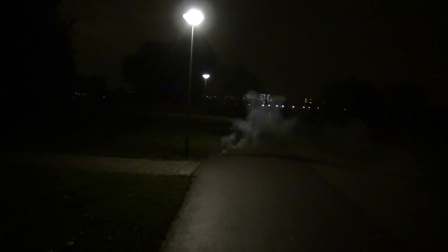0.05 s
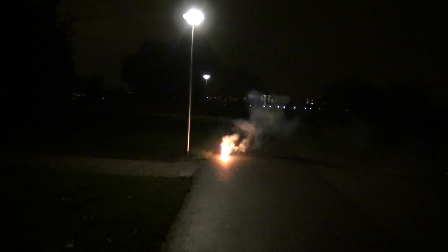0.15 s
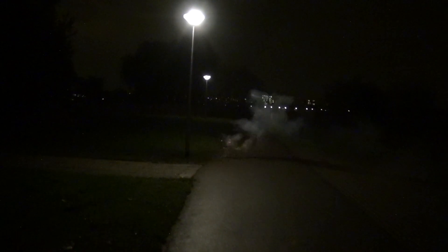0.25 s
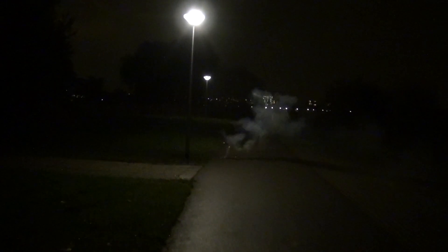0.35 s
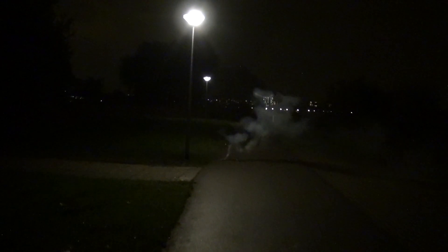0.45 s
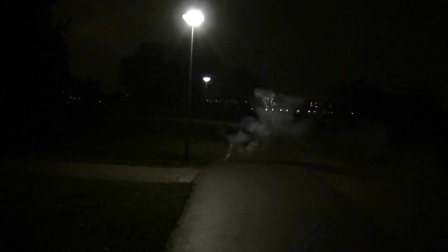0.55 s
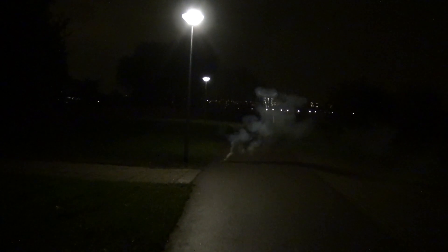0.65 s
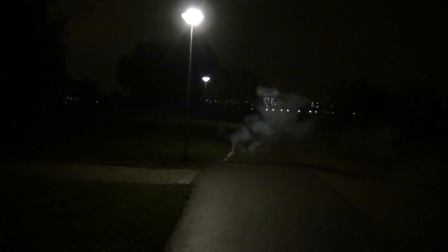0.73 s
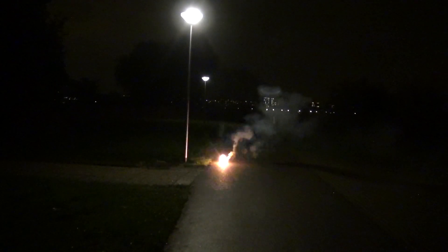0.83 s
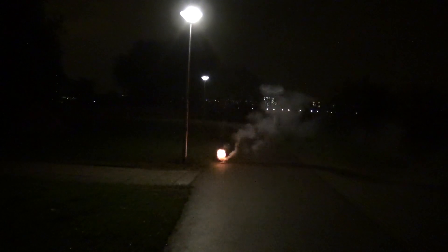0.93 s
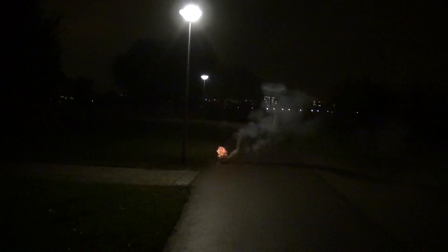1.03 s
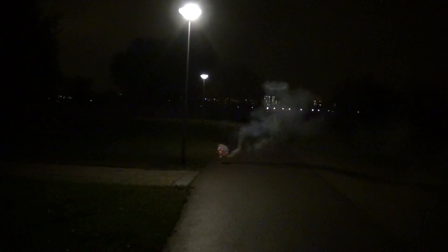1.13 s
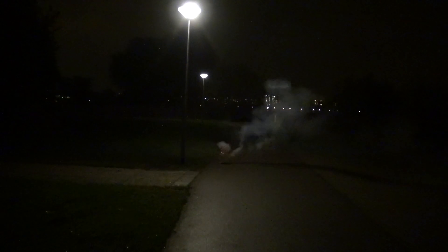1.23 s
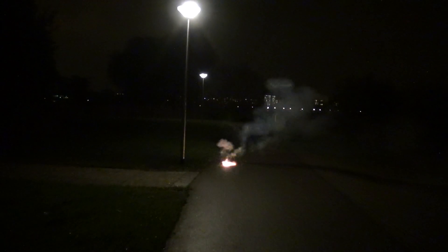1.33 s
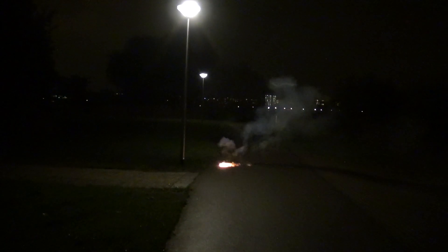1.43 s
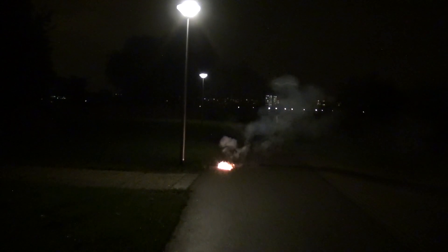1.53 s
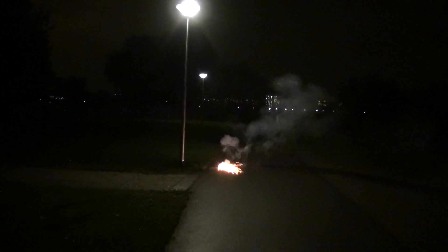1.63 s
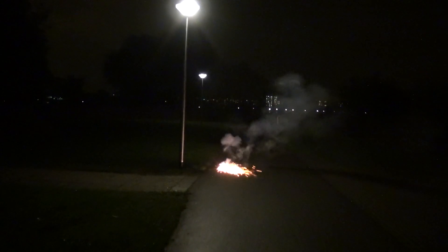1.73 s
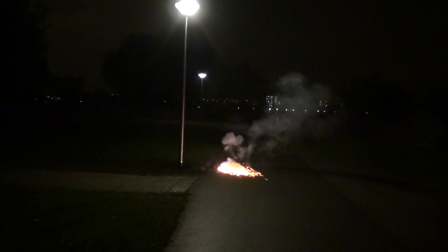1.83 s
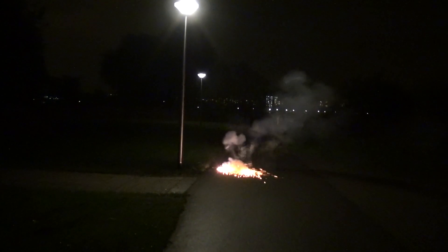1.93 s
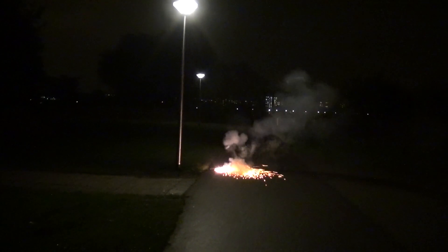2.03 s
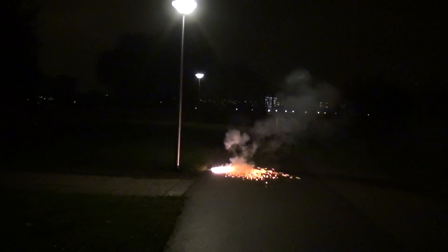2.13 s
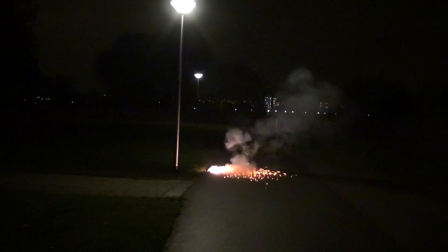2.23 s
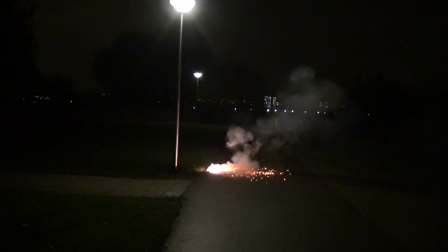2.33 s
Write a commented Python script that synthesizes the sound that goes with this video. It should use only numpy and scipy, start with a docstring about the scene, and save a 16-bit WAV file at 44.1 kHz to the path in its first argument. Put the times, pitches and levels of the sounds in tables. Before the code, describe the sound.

Firecracker fizzes faintly, bangs three times outdoors with quick echoes, then flares into a spitting, roaring jet

```python
"""First a fuse fizzes faintly over the rumble of a distant town, on a paved park path at night.
Then a firecracker cracks three times and burns as a roaring, spitting flame.
Each crack is a shock front with swings, a thump and tearing noise; it overloads the close microphone.
A lamp post, a wall on the left and the trees around return it as filtered echoes and grainy scatter.
Town, fuse and flame are coloured noise in two channels, the last two with drawn level curves."""
import sys
import numpy as np
from scipy import signal
from scipy.fft import rfft, irfft
from scipy.io import wavfile
from scipy.ndimage import uniform_filter1d

SR = 44100
rng = np.random.default_rng(int(sys.argv[2]) if len(sys.argv) > 2 else 0)


def put_to_file(sound):
    """Save the sound as 16-bit audio at rate SR, in the file named by the first command-line argument."""
    columns = np.atleast_2d(sound).T  # one column per channel
    safe = np.clip(columns, -1, 1)
    whole_steps = np.round(safe * 32767)
    wavfile.write(sys.argv[1], SR, whole_steps.astype(np.int16))


N = 105840  # samples, 2.4 s


def undb(db):
    """Amplitude gain of a level in dB."""
    return 10 ** (np.asarray(db) / 20)


def pan(left_right_db):
    """Left and right gains for a level difference; positive leans left."""
    return undb(np.array([[left_right_db], [-left_right_db]]) / 2)


def noise(spectrum, grain_db=0):
    """Noise of rms 1 with the given colour; uneven sample sizes make it crackle."""
    table_hz, table_db = np.array(spectrum, float).T
    hz = np.maximum(np.arange(N // 2 + 1) * SR / N, 1)
    grain_size = np.minimum(rng.exponential(size=N), 7)
    grains = rng.standard_normal(N) * undb(grain_db * grain_size)
    colour = undb(np.interp(np.log(hz), np.log(table_hz), table_db))
    bass_cut = hz / np.hypot(hz, 20)
    coloured = irfft(rfft(grains) * colour * bass_cut, N)
    return coloured / coloured.std()


def wide(spectrum, likeness, grain_db=0):
    """Two channels of noise, alike to the given degree (0-1), mixed from a middle and a side."""
    mid, side = noise(spectrum, grain_db), noise(spectrum, grain_db)
    side_signs = np.array([[1], [-1]])
    return np.sqrt((1 + likeness) / 2) * mid + np.sqrt((1 - likeness) / 2) * side * side_signs


def walk(hz):
    """Smooth random curve with a spread of 1, from noise averaged twice over 1/hz seconds."""
    width = max(int(SR / hz), 1)
    smooth = uniform_filter1d(uniform_filter1d(rng.standard_normal(N), width), width)
    return smooth / smooth.std()


def ms_since(start):
    """Milliseconds since a moment in seconds, negative before it."""
    return (np.arange(N) - round(start * SR)) * 1000 / SR


def swing(start, hz, decay_ms):
    """Pressure swinging briefly behind a shock front: a decaying cosine."""
    ms = ms_since(start)
    cycles = hz * ms / 1000
    return (ms >= 0) * np.cos(2 * np.pi * cycles) * np.exp(-np.abs(ms) / decay_ms)


def thump(start, hz, rise_ms):
    """A low push of gas: a sine whose envelope peaks at rise_ms and dies away."""
    ms = np.maximum(ms_since(start), 0)
    cycles = hz * ms / 1000
    envelope = (ms / rise_ms * np.exp(1 - ms / rise_ms)) ** 2
    return -np.sin(2 * np.pi * cycles) * envelope


# Far off, low rumble of the town: f/Hz, relative level per Hz/dB
TOWN_RUMBLE = [(25, 1.5), (55, -8.5), (100, -5), (128, -1.5), (195, -7.5), (260, -24.5), (500, -37),
               (2000, -77)]
# Far off, wash of its roads: f/Hz, relative level per Hz/dB
ROAD_WASH = [(100, -1), (300, -5), (450, -8.5), (680, -4), (1250, -5.5), (2200, -14.5), (4000, -24.5),
             (9000, -29), (16000, -33)]
RUMBLE_DB, RUMBLE_LIKENESS = -40, 0.72
ROADS_DB, ROADS_LIKENESS = -43, 0.27


def town():
    """Far traffic: a rumble largely common to both ears and a wider wash, both steady noise."""
    rumble = undb(RUMBLE_DB) * wide(TOWN_RUMBLE, RUMBLE_LIKENESS)
    roads = undb(ROADS_DB) * wide(ROAD_WASH, ROADS_LIKENESS)
    return rumble + roads


# Course of the fuse at the microphone: t/s, level/dB
FUSE_LEVELS = [(0, -46), (.05, -46.5), (.11, -54.5), (.2, -52), (.48, -55), (.61, -48), (0.729, -59),
               (0.898, -65), (1.298, -53), (1.419, -44)]
# Colour of its fizz: f/Hz, relative level per Hz/dB
FUSE_FIZZ = [(500, 1), (1700, 4), (3000, 0), (6000, -4.5), (8500, -23), (11000, -40), (16000, -34)]
# Crackle and likeness of the ears (0-1), shared by the fuse and the hiss of the flame
SPARK_GRAIN_DB, HISS_LIKENESS = 3, 0.96


def fuse(t):
    """A faint, grainy fizz of burning powder that comes and goes until the flame is lit."""
    times, level_db = np.array(FUSE_LEVELS).T
    fizz = wide(FUSE_FIZZ, HISS_LIKENESS, SPARK_GRAIN_DB)
    return undb(np.interp(t, times, level_db)) * (t < times[-1]) * fizz


# Course of the flame at the microphone, before flutter: t/s, roar level/dB, hiss level/dB
FLAME_LEVELS = [(1.422, -26, -39), (1.45, -37.5, -28), (1.55, -29, -36), (1.61, -31.5, -41.5),
                (1.71, -27, -32.5), (1.80, -25.5, -38.5), (1.94, -25, -36), (1.99, -24, -27.5),
                (2.084, -25.5, -25.5), (2.134, -30.5, -34), (2.18, -32, -43), (2.4, -41.5, -56)]
# Colour of its roar: f/Hz, relative level per Hz/dB
FLAME_ROAR = [(50, -31), (110, -18), (190, -2), (350, 0.5), (650, 3), (1250, 0.5), (1900, -8), (3500, -23),
              (8000, -34.5)]
# Colour of its hiss: f/Hz, relative level per Hz/dB
FLAME_HISS = [(400, 10.5), (1300, -2.5), (2500, 2), (4200, -5.5), (8000, -11), (11000, -19.5),
              (16000, -88.5)]
# Puffs of gas in the flame: t/s, level/dB
GAS_PUFFS = [(1.927, -14), (1.983, -24), (2.019, -31)]
FLUTTER_DB, FLUTTER_HZ, ROAR_LIKENESS = 0.52, 69, 0.99
PUFF_HZ, PUFF_RISE_MS = 189, 2.9


def flame(t):
    """The last bang lights a fluttering jet: a swelling roar, a spitting hiss and low puffs of gas."""
    times, roar_db, hiss_db = np.array(FLAME_LEVELS).T
    flutter_db = FLUTTER_DB * walk(FLUTTER_HZ)
    roar_gain = undb(np.interp(t, times, roar_db) + flutter_db)
    hiss_gain = undb(np.interp(t, times, hiss_db) + flutter_db)
    roar = roar_gain * wide(FLAME_ROAR, ROAR_LIKENESS)
    hiss = hiss_gain * wide(FLAME_HISS, HISS_LIKENESS, SPARK_GRAIN_DB)
    puffs = sum(undb(db) * thump(start, PUFF_HZ, PUFF_RISE_MS) for start, db in GAS_PUFFS)
    return (t > times[0]) * (roar + hiss) + puffs


# Scatter from ground and groups of trees: delay t/s, spread in log delay, level/dB,
# left-right/dB, likeness of the ears (0-1), treble lift/dB at TREBLE_HZ
TREE_GROUPS = [(.012, 0.88, -50, -7.5, .85, -0.5), (0.045, 0.25, -41.5, 5.5, 0.43, 9.5),
               (.085, 0.22, -44.5, 5, 0.66, 0.5), (.14, 0.24, -48.5, 4, 0.08, 7.5),
               (0.211, 0.18, -57, 3, 0.77, 7.5), (.37, 0.2, -68, 1.5, 1, 1.5)]
# Colour the foliage returns: f/Hz, relative level per Hz/dB
FOLIAGE_COLOUR = [(60, 4), (180, 5), (430, -3.5), (650, -2), (900, -3), (1300, -0.5), (2500, 2.5),
                  (4200, -2), (8000, -4), (11000, -14.5), (16000, -24.5)]
FOLIAGE_GRAIN_DB, TREBLE_HZ = 3, 10400


def trees():
    """Many small reflections: grainy noise that swells and fades around each group's delay."""
    scatter = np.zeros((2, N))
    t = np.arange(1, N + 1) / SR  # starts one sample late, for the logarithm
    for delay, spread, level_db, pan_db, likeness, treble_db in TREE_GROUPS:
        colour = [(hz, db + treble_db * hz / TREBLE_HZ) for hz, db in FOLIAGE_COLOUR]
        swell = np.exp(-0.5 * (np.log(t / delay) / spread) ** 2)
        leaves = wide(colour, likeness, FOLIAGE_GRAIN_DB)
        scatter += undb(level_db) * pan(pan_db) * swell * leaves
    return scatter


# Single echoes: delay t/s, level before band filter/dB, left-right/dB, smear/ms,
# bass edge f/Hz, treble edge f/Hz
SINGLE_ECHOES = [(0.012, -11.5, 15, 0.052, 1380, 8040), (.0225, -23, 7, 0.15, 900, 6000),
                 (0.044, -21, 17, 3, 300, 2750), (0.08, -15.5, 12, .4, 800, 3200),
                 (0.0845, -12, 12, 0.66, 610, 4950), (0.1041, -23, -10, 0.54, 900, 8300),
                 (0.1445, -23, 3, 3.9, 900, 4500), (0.1809, -17.5, 3.5, 1.4, 406, 1880),
                 (0.36, -28, 1, 6.9, 820, 4350), (.4000, -32, 1, 4, 754, 2000),
                 (.4270, -33, -4, 2.1, 684, 1800)]


def echoes():
    """Each single reflector returns a click with a rough, decaying tail, limited to a band."""
    reflections = np.zeros((2, N))
    for delay, level_db, pan_db, smear_ms, low_hz, high_hz in SINGLE_ECHOES:
        ms = ms_since(delay)
        tail = (ms > 0) * np.exp(-np.abs(ms) / smear_ms) * rng.standard_normal(N)
        echo = (ms == 0) + tail
        echo = echo / np.linalg.norm(echo) + 1e-18  # unit energy; the offset is inaudible
        band = signal.butter(2, [low_hz, high_hz], "band", fs=SR, output="sos")
        reflections += undb(level_db) * pan(pan_db) * signal.sosfilt(band, echo)
    return reflections


# Bangs close to the microphone: t/s, shock level/dB, shock length/ms, after-swing f/Hz,
# after-swing level/dB, low swing level/dB, thump level/dB, tearing level/dB,
# tearing lead/ms, tearing decay/ms
CRACKS = [(0.2226, 10.5, 0.13, 1168, 9.5, 4, -2, -3, 0.037, 1.54),
          (.9240, 19.5, 0.12, 1050, 10.5, -2.5, -10.5, -8, 0.038, 3.3),
          (1.4198, 1.5, 0.13, 950, -1.5, -0.5, -6.5, -6, 0.94, 4.16)]
# Colour of the torn casing: f/Hz, relative level per Hz/dB
TORN_CASING = [(60, -17), (300, 8), (1000, -0.5), (3000, 1), (6000, -7), (11000, -10.5), (16000, -34)]
SWING_DECAY_MS, LOW_SWING_HZ, LOW_SWING_DECAY_MS = 0.93, 680, 1.78
THUMP_HZ, THUMP_RISE_MS = 208, 1.64
# The wall returns the thump slightly stretched; its level is relative to the thump
WALL_DELAY_S, WALL_BOOM_DB, WALL_PAN_DB, WALL_RISE_MS = 0.0850, -8, 9.5, 2.54
BODY_SCATTER_DB = -12  # share of after-swings, thump and tearing that reaches the park


def bangs():
    """Steep shocks with suction, two after-swings, a thump and tearing paper; the park answers."""
    shocks, near, boom = np.zeros((3, N))
    for (start, shock_db, length_ms, swing_hz, swing_db, low_db,
         thump_db, tear_db, lead_ms, tear_ms) in CRACKS:
        ms = ms_since(start)
        age = np.maximum(ms, 0)
        # pressure jumps, crosses zero after length_ms and recovers from suction
        shocks += undb(shock_db) * (ms >= 0) * (1 - age / length_ms) * np.exp(-age / length_ms)
        near += undb(swing_db) * swing(start, swing_hz, SWING_DECAY_MS)
        near += undb(low_db) * swing(start, LOW_SWING_HZ, LOW_SWING_DECAY_MS)
        tear_envelope = np.exp(np.minimum(ms, 0) / lead_ms - age / tear_ms)
        near += undb(tear_db) * tear_envelope * noise(TORN_CASING)
        near += undb(thump_db) * thump(start, THUMP_HZ, THUMP_RISE_MS)
        boom += undb(thump_db + WALL_BOOM_DB) * thump(start + WALL_DELAY_S, THUMP_HZ, WALL_RISE_MS)
    sent_out = shocks + undb(BODY_SCATTER_DB) * near
    park = trees() + echoes()
    answer = signal.fftconvolve(sent_out[None], park, axes=1)[:, :N]
    return shocks + near + pan(WALL_PAN_DB) * boom + answer


def scene():
    """Town, fuse, flame and bangs together at the microphone."""
    t = np.arange(N) / SR
    return town() + fuse(t) + flame(t) + bangs()


CLIP_LEVEL, BASS_CUT_HZ, TOP_HZ = 1, 30, 15700


def record(dry):
    """The microphone clips the shocks flat; the recorder cuts the deepest bass and the top."""
    clipped = np.clip(dry, -CLIP_LEVEL, CLIP_LEVEL)
    bass_cut = signal.butter(1, BASS_CUT_HZ, "high", fs=SR, output="sos")
    top_cut = signal.ellip(8, 0.2, 70, TOP_HZ, fs=SR, output="sos")
    return signal.sosfilt(top_cut, signal.sosfilt(bass_cut, clipped))


dry = scene()
out = record(dry)
put_to_file(out)
```